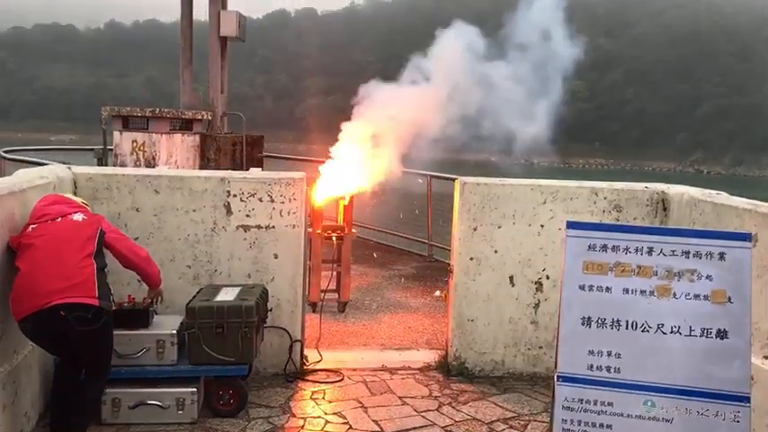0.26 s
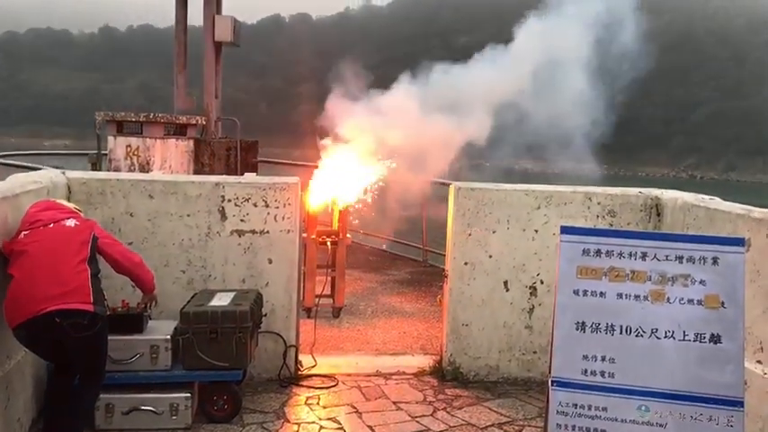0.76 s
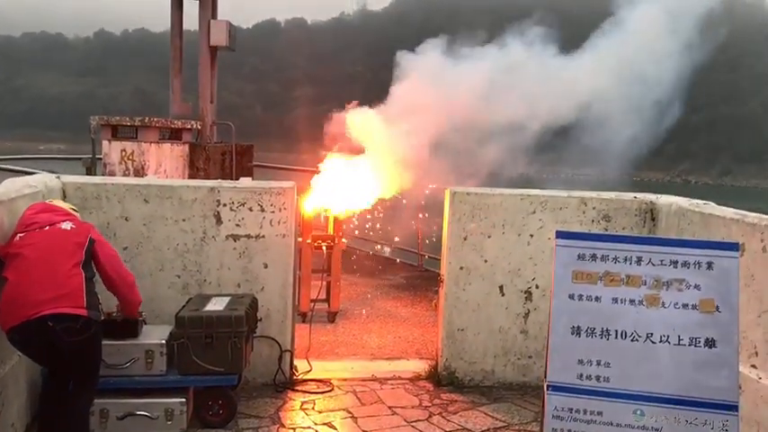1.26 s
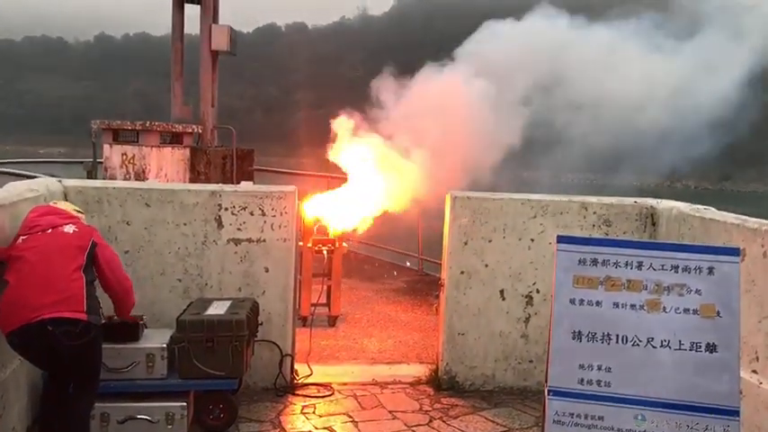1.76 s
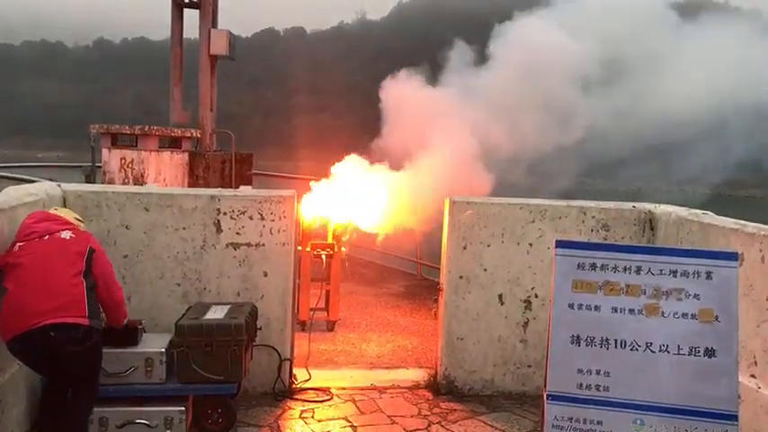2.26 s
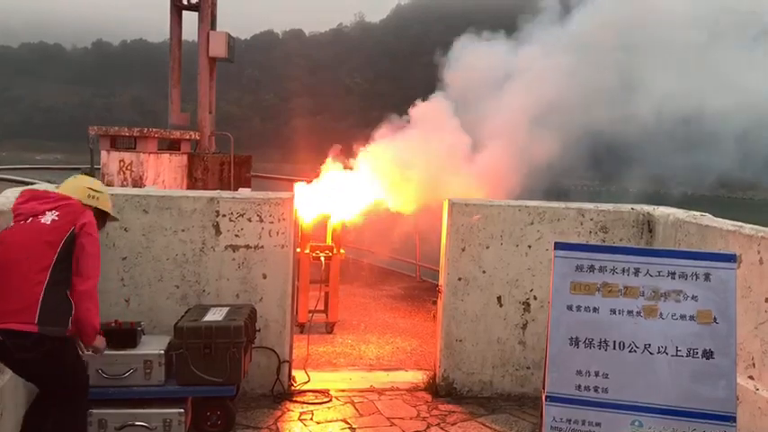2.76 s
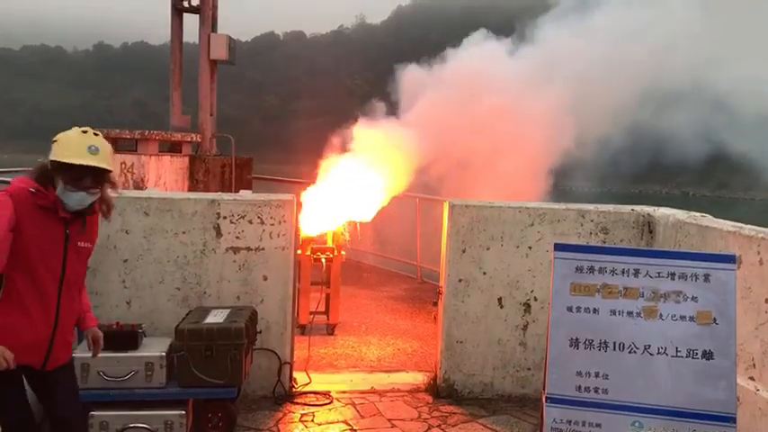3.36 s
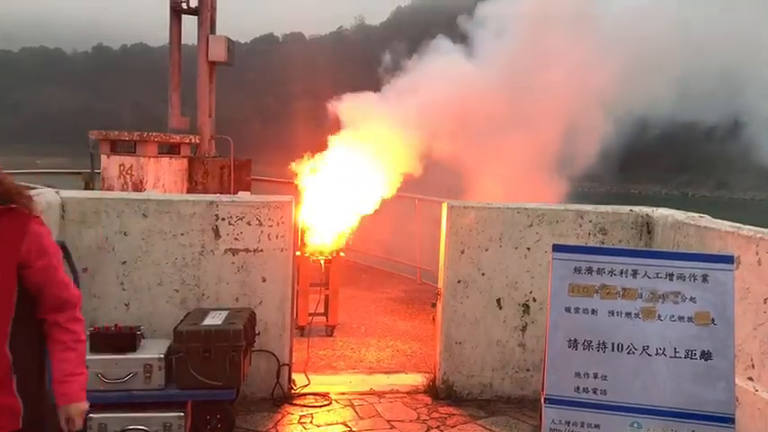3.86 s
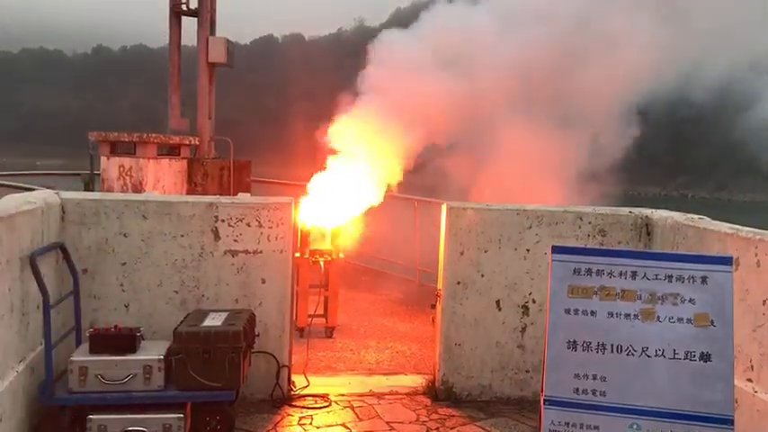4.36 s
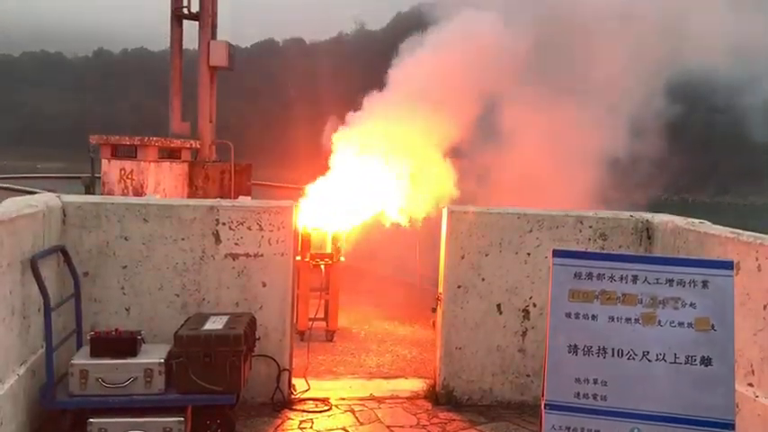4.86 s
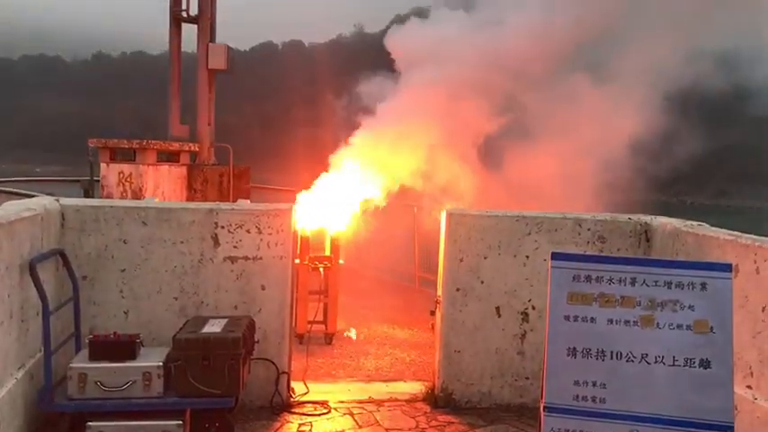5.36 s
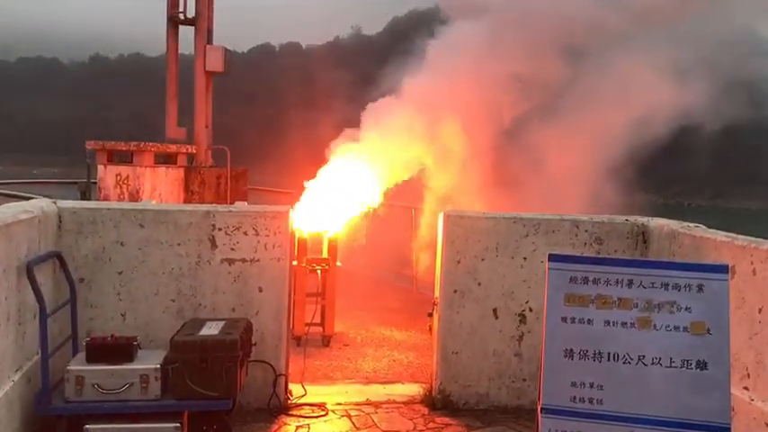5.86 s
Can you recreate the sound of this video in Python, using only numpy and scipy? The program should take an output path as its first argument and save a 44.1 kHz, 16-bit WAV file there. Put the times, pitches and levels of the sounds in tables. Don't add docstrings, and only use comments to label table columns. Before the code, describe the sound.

Burning flare rushes quietly, explodes in one loud crack with a tiny squeal, pops three times, then hisses and roars on unevenly.

```python
import sys
import numpy as np
from scipy import signal
from scipy.fft import rfft, irfft
from scipy.io import wavfile
from scipy.ndimage import uniform_filter1d

SR = 44100
rng = np.random.default_rng(int(sys.argv[2]) if len(sys.argv) > 2 else 0)


def put_to_file(sound):
    columns = np.atleast_2d(sound).T
    safe = np.clip(columns, -1, 1)
    whole_steps = np.round(safe * 32767)
    wavfile.write(sys.argv[1], SR, whole_steps.astype(np.int16))


def nominal_scale(level):
    x = np.asarray(level, float) / 20
    return 10 ** x


N = 269451
BANG_S = 0.501


def evened(x):
    return x / np.sqrt(np.mean(abs(x) ** 2) + 1e-20)


def read(points, hz):
    f, value = np.transpose(points)
    return np.interp(np.log(hz + 1), np.log(f + 1), value, left=value[0] - 30, right=value[-1] - 30)


def add(mix, s, sound):
    part = mix[round(s * SR):][:len(sound)]
    part += sound[:len(part)]


def coloured(x, points):
    return irfft(rfft(x) * nominal_scale(read(points, np.fft.rfftfreq(len(x), 1 / SR))), len(x))


def lasting(t, start, end, fade):
    return np.clip(np.minimum(t - start, end - t) / fade + .5, 0, 1)


def drifting(x, first, second):
    return evened(uniform_filter1d(uniform_filter1d(x, size=first), size=second))


def turbulence(colour, patchy_db, flicker_db, lean=(1000, 0), comb_db=0, size=512):
    frames, hz = 4 * N // size + 5, np.fft.rfftfreq(size, 1 / SR)
    a, b, patches = rng.standard_normal((frames, len(hz), 3)).T
    patches = evened(uniform_filter1d(uniform_filter1d(patches, size=4, axis=0), size=30, axis=1))
    flicker = drifting(rng.standard_normal(frames), 6, 4)
    slope = np.resize(lean[1] * np.ones(N), frames * size)[::size // 4][:frames]
    lean_db = np.log2((hz[:, None] + 1) / lean[0]).clip(-1, 1) * slope
    delay_s = .0023 + .00007 * drifting(rng.standard_normal(frames), 150, 100)
    lean_db += comb_db * np.cos(2 * np.pi * hz[:, None] * delay_s)
    level_db = read(colour, hz)[:, None] + lean_db + patchy_db * patches + flicker_db * flicker
    z = (a + 1j * b) * nominal_scale(level_db)
    return evened(signal.istft(z, nperseg=size, noverlap=size * 3 // 4)[1][:N])


# delay_s, gain (below zero = inverted)
ECHOES = [(0.00077, -0.016), (0.00109, -0.16), (0.00136, 0.25), (0.00173, 0.14), (0.00204, -0.19),
          (0.00217, -0.11), (0.00328, 0.19), (0.00447, -0.19)]
# freq_hz, level_db
BOUNCE_COLOUR = [(200, -2.5), (400, 2.2), (1000, -2), (2000, -5.5), (4500, -4.5), (8000, -18), (16000, -17)]
# freq_hz, width_hz, level_db
WALL_GAPS = [(1172, 88, -3), (1850, 44, -5.5), (2590, 60, -3), (3100, 64, -3.5), (3810, 50, -3),
             (4000, 43, -1.5), (4330, 44, -2.5)]


def paving(x):
    hz = np.fft.rfftfreq(N, 1 / SR)
    copies = sum(gain * np.exp(-2j * np.pi * hz * s) for s, gain in ECHOES)
    for u, sign in rng.random((12, 2)) - [0, .5]:
        copies += 0.04 * np.sign(sign) * np.exp(-2j * np.pi * hz * (.005 + .02 * u))
    gaps_db = sum(db * np.exp(-((hz - f) / width) ** 2) for f, width, db in WALL_GAPS)
    return irfft(rfft(x) * nominal_scale(gaps_db) * (1 + nominal_scale(read(BOUNCE_COLOUR, hz)) * copies), N)


# start_s, level_db, centre_hz, width_octaves, t60_s
SPARKS = [(.191, -49, 6000, 1.2, .02), (0.421, -21, 5570, 0.6, 0.011), (.422, -20.5, 1800, 0.39, 0.021),
          (.479, -15.5, 1300, 1.35, 0.018), (0.507, -15, 13000, 0.27, 0.013), (.641, -34, 5000, 0.54, .015),
          (.663, -34, 4000, .6, .015), (.675, -34, 5000, .7, 0.013), (0.692, -36, 5500, .8, .015),
          (.726, -39, 5500, .8, 0.018), (0.942, -36, 8800, 1.2, 0.035), (1.086, -40, 7000, 0.97, .03),
          (1.3383, -32, 6650, 0.9, 0.022), (4.243, -33, 6070, 0.98, 0.019)]


def spark(db, hz, octaves, t60):
    t = np.arange(2000) / SR
    near, far = 2 ** octaves, 4 ** octaves
    colour = [(hz / far, -30), (hz / near, -8), (hz, 0), (hz * near, -8), (hz * far, -30)]
    noise = evened(coloured(rng.standard_normal(len(t)), colour))
    return nominal_scale(db - 60 * t / t60) * noise * np.minimum(t / 0.00042, 1)


# start_s, level_db, pitch_hz, length_cycles
THUMPS = [
    (.49, -18, 960, 7.3),
    (0.5015, -3, 910, 1.9),
    (.505, -10, 1200, 6.2),
    (0.5121, -10, 1135, 9.5),
    (0.524, -16, 1200, 15),
    (.503, -13, 55.6, 2),
    (1.121, -30, 328, 7.3),
    (1.577, -28, 322, 7.1),
    (2.103, -21.5, 124.4, 1.7),
]


def thump(db, hz, cycles):
    u = np.arange(round(cycles / hz * SR)) / SR * hz
    return nominal_scale(db) * np.sin(2 * np.pi * u) * np.sin(np.pi * u / cycles) ** 2


# start_s, peak_db, t60_s
POPS = [
    (1.1139, -12.5, 0.06),
    (1.5697, -12, 0.061),
    (2.0919, -10, 0.044),
]
# freq_hz, level_db_per_hz
POP_COLOURS = [
    [(150, -34), (250, -3), (1670, -2), (4470, -1.5), (5400, -9), (9560, -8), (15500, -18)],
    [(150, -37), (250, -5), (1410, -5), (3630, -8), (4100, 0), (7000, -11), (9560, -7), (15500, -19)],
    [(240, -42), (400, -19), (1710, -5), (3300, -1.5), (4490, -12), (6480, -7), (7210, -16), (15500, -15)],
]


def pop(db, t60, colour):
    t = np.arange(6000) / SR
    noise, spikes = rng.standard_normal((2, len(t)))
    swarm = noise * nominal_scale(2.5 * evened(uniform_filter1d(spikes, size=12)))
    fall = nominal_scale(-60 * np.maximum(t - .004, 0) / t60) + 0.13 * nominal_scale(-60 * t / (4.4 * t60))
    return nominal_scale(db - 6.0) * evened(coloured(swarm, colour)) * fall * np.minimum(t / 0.00042, 1)


# start_s, lower_hz, lower_db, upper_hz, upper_db
SQUEAL = [(.481, 1950, -50, 3000, -40), (0.485, 2020, -32, 2970, -22), (.49, 2180, -17.5, 3020, -29),
          (.494, 2520, -13.5, 3000, -21), (0.497, 2430, -14, 3030, -5.5), (.499, 2470, -24, 2980, -19),
          (.502, 2500, -40, 3000, -34)]


def squeal():
    s, low_hz, low_db, up_hz, up_db = np.transpose(SQUEAL)
    t = np.arange(s[0], s[-1], 1 / SR)
    low, up = (2 * np.pi * np.cumsum(np.interp(t, s, f)) / SR for f in (low_hz, up_hz))
    stack = np.sin(low) + 0.091 * np.sin(2 * low) + 0.079 * np.sin(3 * low)
    return nominal_scale(np.interp(t, s, low_db)) * stack + nominal_scale(np.interp(t, s, up_db)) * np.sin(up)


# start_s, level_db, length_s
CRACK = (.5013, -6, 0.00017)


def crack(db, length):
    u = np.arange(300) / SR / length
    return nominal_scale(db) * (1 - u) * np.exp(-u / 1.4) * np.minimum(3.1 * u, 1)


# start_s, level_db, brightness_db
BLOWS = [
    (0.501, -8, 2.5),
    (0.5063, -15.5, -7),
    (0.5123, -10.5, 1),
    (.519, -17, 2),
    (.533, -21.5, -5),
    (.556, -29, -7),
    (.602, -29, -5),
]
# freq_hz, level_db_per_hz
BANG_COLOUR = [(40, -34), (200, -7.5), (600, -12), (1150, 0.5), (1900, -13), (2800, -8.5), (8500, -23),
               (16000, -25)]
# freq_hz, t60_s
BANG_T60 = [(100, 0.58), (600, 0.18), (1000, .22), (1400, .18), (2200, 0.11), (4000, 0.16), (8000, 0.165),
            (15000, .125)]


def blow(db, bright_db, late_s):
    noise = coloured(rng.standard_normal(16000), BANG_COLOUR)
    hz, t, z = signal.stft(noise, SR, nperseg=128)
    slope = bright_db * np.exp(-t / 0.0028) - 35 * late_s
    tilt_db = np.log2(np.maximum(hz, 1500) / 1500)[:, None] * slope
    speed = 60 / np.interp(hz, *np.transpose(BANG_T60))[:, None]
    burst = signal.istft(z * nominal_scale(tilt_db - speed * t), SR, nperseg=128)[1]
    return nominal_scale(db) * burst / np.std(burst[:400]) * np.minimum(np.arange(len(burst)) / 12, 1)


# start_s, pressure_db, heat (0-1); hotter flames trade roar for hiss
BURN = [(0, -38, 0.34), (.1, -39.5, 0.32), (.41, -39.5, 0.47), (0.921, -37, 0.17), (1.2, -37.5, 0.18),
        (1.36, -30.5, 0), (1.559, -32.5, .03), (1.7, -35, .12), (1.95, -35, 0.31), (2.25, -36.5, 0.52),
        (2.899, -37.5, 0.63), (3.02, -39, 0.53), (3.379, -41, 0.8), (3.691, -39, 0.65), (3.8, -39.5, 0.86),
        (4.701, -40, 0.83), (5.0, -42, 1), (6.11, -40.5, 0.92)]
# start_s, length_s, level_db, thinness (-1 hiss to 1 fizz)
GUSTS = [(.44, 0.089, 5.5, -.7), (1.428, 0.088, 2, -.9), (1.75, 0.31, -1, -.9), (2.074, 0.082, 3.5, -.3),
         (2.23, 0.094, 1.5, .6), (2.423, .16, 2, 0.5), (2.624, 0.13, 1, .8), (2.903, .14, 1, .3),
         (3.423, 0.063, 2.5, -.8), (3.496, 0.15, 3.5, 0.56), (3.585, 0.072, -2, -0.14), (3.628, .08, 1, 0),
         (3.757, 0.16, 2.5, -.4), (3.966, .12, 2, 0), (4.153, 0.26, 1, 0.88), (4.307, 0.17, -2.5, 0),
         (4.44, .14, 2, -.5), (4.72, .1, 2, -.5), (.8, .5, 2, -.3), (5.86, .1, -2.5, -.7),
         (4.548, .17, -3.5, -.2), (4.638, 0.092, 2.5, 0.11), (4.794, 0.11, -3, .4), (4.926, 0.09, 3.5, -.3),
         (4.976, 0.059, -4.5, -.2), (5.388, 0.15, -2.5, -.4), (5.917, 0.1, -1, 0.74), (5.967, 0.067, -8, 0),
         (6.038, .07, -4, 0.77)]
# start_s, end_s, fade_s
SPITS = (4.87, 5.95, 0.098)


def fire():
    t = np.arange(N) / SR
    s, *state = np.transpose(BURN)
    pressure_db, heat = (np.interp(t, s, v) for v in state)
    gust_db, thin_db = np.zeros((2, N))
    for at, length, db, thinness in GUSTS:
        swing = db * np.cos(np.pi * ((t - at) / length).clip(-.5, .5)) ** 2
        gust_db += swing
        thin_db += swing * thinness
    return t, pressure_db, heat, lasting(t, *SPITS), gust_db, thin_db


FOLLOW = {"roar": (0, 0, .1, 0, 0), "mouth": (-5.5, 11, 0.37, 1, .1), "hiss": (-17, 6.5, 1.12, 7.5, 1.57),
          "fizz": (-15, 21, 0.94, 0.5, 0.06), "rumble": (-8.5, 15, 0, -1.5, -1.09)}


def jet_gain(name, state):
    t, pressure_db, heat, spitting, gust_db, _ = state
    cold, hot, share, spit, ageing = FOLLOW[name]
    return nominal_scale(pressure_db + cold + hot * heat + share * gust_db + spit * spitting + ageing * t)


def sputter():
    strength = nominal_scale(2.3 * np.minimum(rng.exponential(1, N), 5))
    return strength * (rng.random(N) < 900 / SR) * rng.choice([-1, 1], N)


# freq_hz, level_db_per_hz
RUMBLE = [(30, -12), (42, -12.5), (58, 1), (120, -4.5), (200, -2.5), (330, -14), (500, -31)]


def rumble(state):
    return jet_gain("rumble", state) * turbulence(RUMBLE, 1.5, 0.97, size=2048)


# freq_hz, level_db_per_hz
FIZZ = [(7000, -15), (8200, -5), (9300, -3.5), (10500, -7), (11500, -1), (13500, -0.5), (15300, -1),
        (16500, -24)]


def fizz(state):
    thin_db = state[-1]
    return jet_gain("fizz", state) * nominal_scale(thin_db) * turbulence(FIZZ, 2.15, 0.93, comb_db=1.0)


# freq_hz, level_db_per_hz
HISS = [(3000, -8.5), (4000, -4), (4800, -4), (6300, -1), (7200, -2), (7900, -10), (9000, -22)]
HISS_LEAN = (-2.5, 2.5)


def hiss(state, grains):
    spitting, thin_db = state[3], state[-1]
    lean = HISS_LEAN[0] + HISS_LEAN[1] * spitting
    rush = turbulence(HISS, 1.5, 0.74, (5800, lean), comb_db=3.5)
    return jet_gain("hiss", state) * nominal_scale(-thin_db) * (rush + 0.24 * evened(coloured(grains, HISS)))


# start_s, end_s, level_db (over pressure), lean_db_per_octave
SINGS = [
    (2.4, 2.97, -1.5, -30),
    (3.3, 3.65, -2, -30),
    (3.746, 4.854, 5, 0),
    (4.847, 5.84, 0, 3),
    (5.84, 6.2, -3, -10),
]
# freq_hz, level_db_per_hz
SONG = [(2300, -28), (2650, -6), (2950, -1), (3200, -3), (3600, -9.5), (4000, -24)]


def song(state):
    t, pressure_db, _, _, gust_db, _ = state
    singing, lean = np.zeros((2, N))
    for start, end, db, slope in SINGS:
        held = lasting(t, start, end, 0.11)
        singing += nominal_scale(db) * held
        lean += slope * held
    return singing * nominal_scale(pressure_db + .4 * gust_db) * turbulence(SONG, .9, 0.6, (2900, lean))


# freq_hz, level_db_per_hz
MOUTH = [(1400, -13.5), (1900, -8.5), (2300, -2.5), (2950, -0.5), (3350, -6.5), (3900, -11), (4800, -24)]
MOUTH_LEAN = (-6, 2.9)


def mouth(state, grains):
    lean = MOUTH_LEAN[0] + MOUTH_LEAN[1] * state[2]
    rush = turbulence(MOUTH, 0.75, 0.64, (2600, lean))
    return jet_gain("mouth", state) * (rush + 0.09 * evened(coloured(grains, MOUTH)))


# freq_hz, level_db_per_hz
ROAR = [(200, -27), (400, -1.5), (650, -1.5), (1100, -2), (1600, -4), (2000, -3.5), (2600, -12.5)]
ROAR_LEAN = (2.83, -5.5, 5.1)


def roar(state, grains):
    _, _, heat, spitting, _, _ = state
    lean = ROAR_LEAN[0] + ROAR_LEAN[1] * heat + ROAR_LEAN[2] * spitting
    rush = turbulence(ROAR, 0.96, 0.49, (950, lean))
    return jet_gain("roar", state) * (rush + 0.35 * evened(coloured(grains, ROAR)))


def flames():
    state, grains = fire(), sputter()
    out = rumble(state) + fizz(state) + hiss(state, grains)
    return out + song(state) + mouth(state, grains) + roar(state, grains)


def scene():
    mix = flames()
    for s, *row in SPARKS:
        add(mix, s, spark(*row))
    for s, *row in THUMPS:
        add(mix, s, thump(*row))
    for (s, *row), colour in zip(POPS, POP_COLOURS):
        add(mix, s, pop(*row, colour))
    add(mix, SQUEAL[0][0], squeal())
    add(mix, CRACK[0], crack(*CRACK[1:]))
    for s, *row in BLOWS:
        add(mix, s, blow(*row, s - BANG_S))
    return np.tile(nominal_scale(-1.27) * paving(mix), (2, 1))


def splits(mono):
    hz, t, z = signal.stft(np.roll(mono, 3000), SR, nperseg=1024)
    mask = 0
    for u, v in rng.random((round(3 * N / SR), 2)):
        low_hz = 4500 + (13800 - 4500) * v
        band = (hz > low_hz) & (hz < low_hz + 1700)
        mask = mask + band[:, None] * (abs(t - u * N / SR) < .012)
    side = nominal_scale(-3) * signal.istft(z * mask, SR, nperseg=1024)[1][:N]
    return side * np.array([[1], [-1]])


def gain_control():
    lengths_s = [0, .122, .015, .05, .045, 0.19, 0.29]
    gain_db = [0, -13.5, -17.5, -17.5, -8, -8, 0]
    return nominal_scale(2 + np.interp(np.arange(N) / SR, BANG_S + np.cumsum(lengths_s), gain_db))


def band_limit(x):
    return signal.sosfilt(signal.butter(12, 16830, fs=SR, output="sos"), x)


def record(dry):
    heard = signal.sosfilt(signal.butter(4, 34, "high", fs=SR, output="sos"), dry)
    ducked = heard * gain_control()
    edge = signal.firwin(1201, 15700, window=("kaiser", 9), fs=SR)[None]
    limited = signal.oaconvolve(1.382 * np.tanh(ducked / 1.626), edge, "same")
    return band_limit(limited + splits(limited[0]))


dry = scene()
out = record(dry)
put_to_file(out)
```